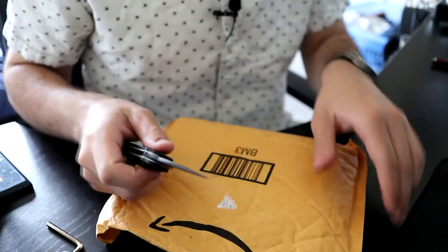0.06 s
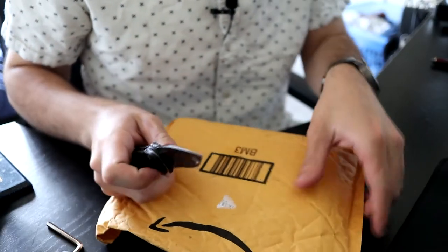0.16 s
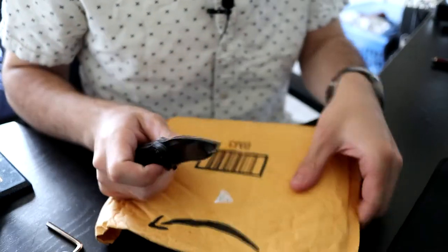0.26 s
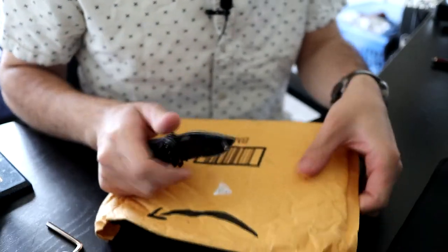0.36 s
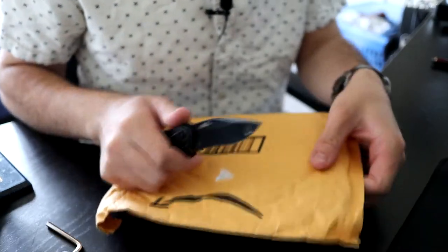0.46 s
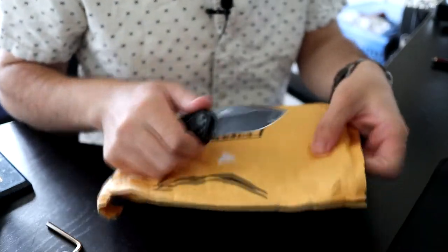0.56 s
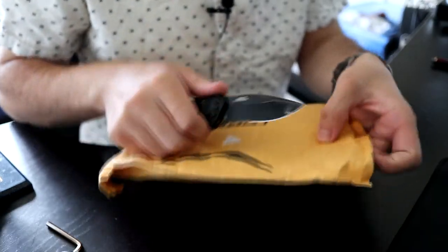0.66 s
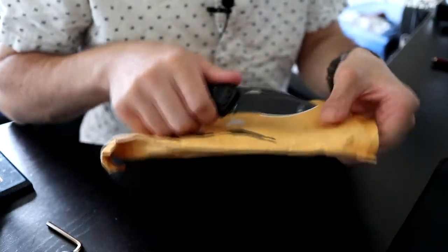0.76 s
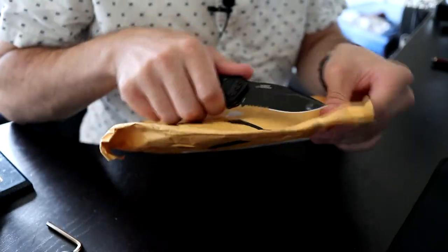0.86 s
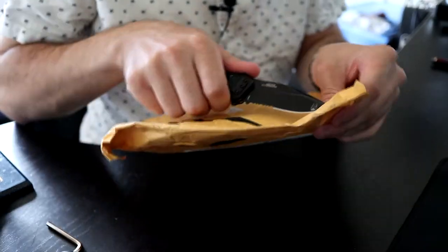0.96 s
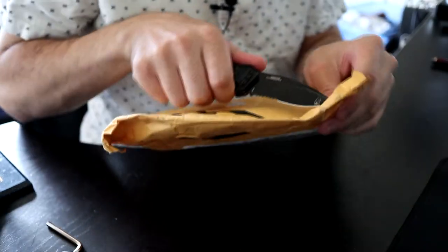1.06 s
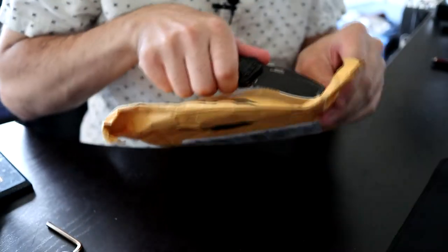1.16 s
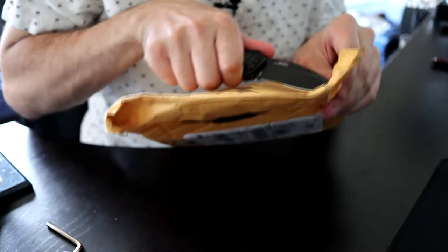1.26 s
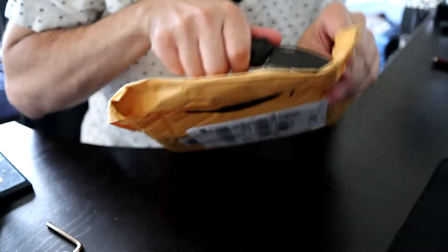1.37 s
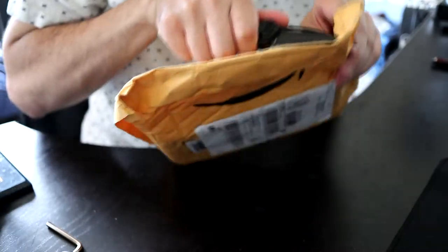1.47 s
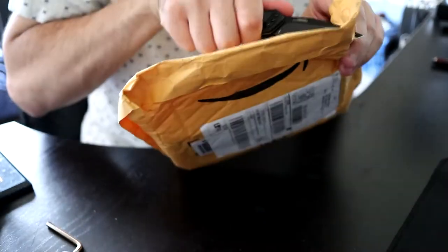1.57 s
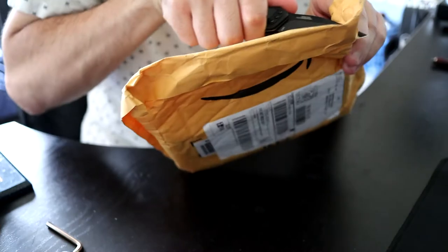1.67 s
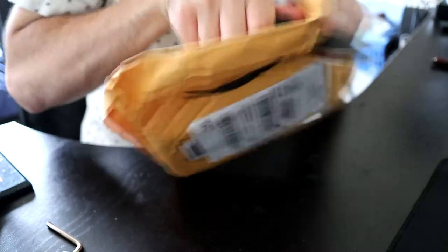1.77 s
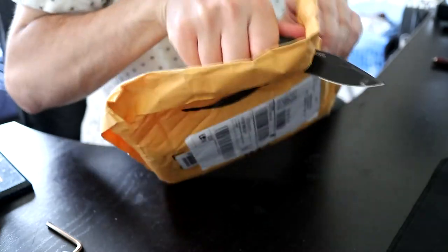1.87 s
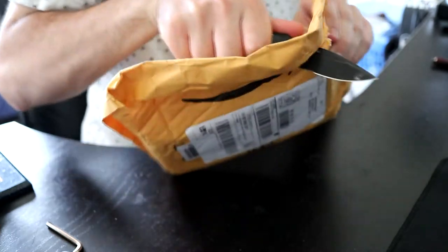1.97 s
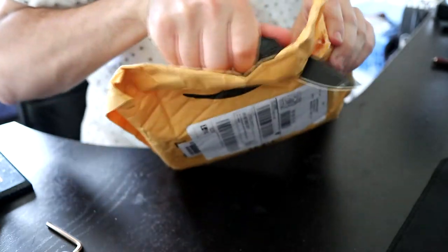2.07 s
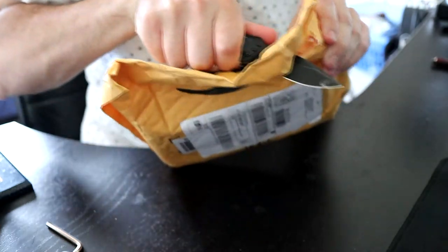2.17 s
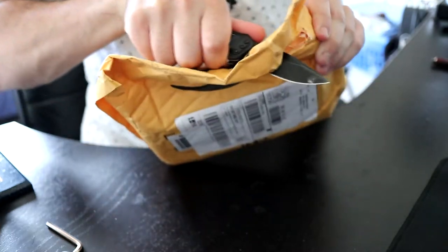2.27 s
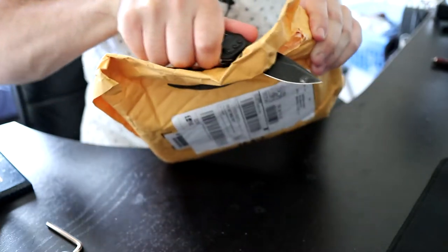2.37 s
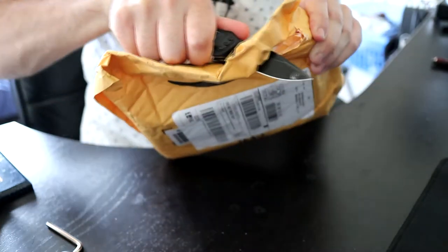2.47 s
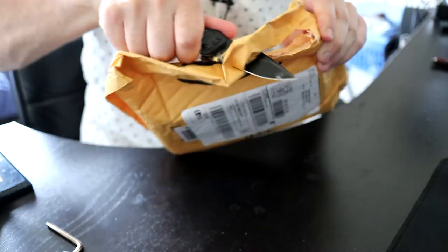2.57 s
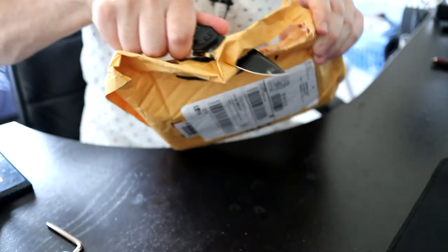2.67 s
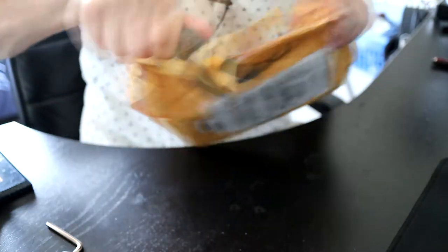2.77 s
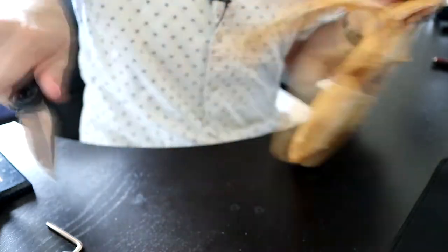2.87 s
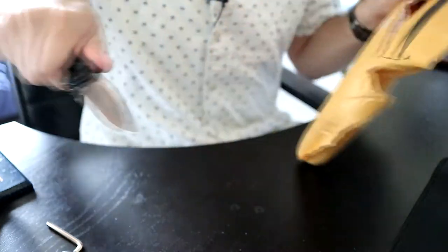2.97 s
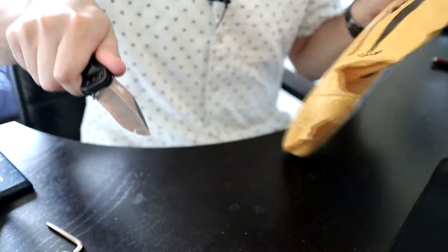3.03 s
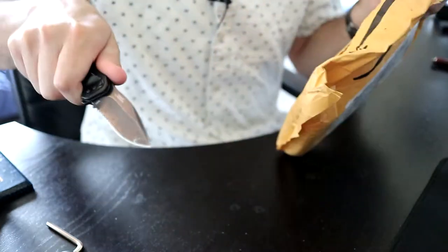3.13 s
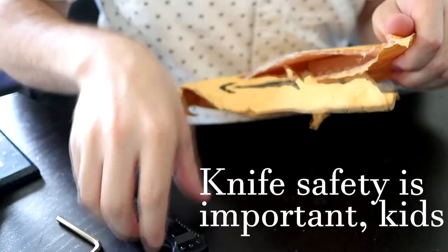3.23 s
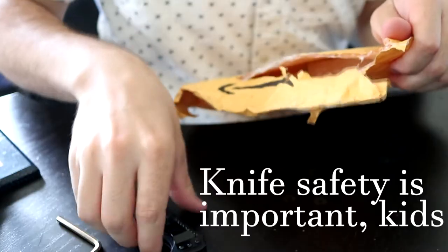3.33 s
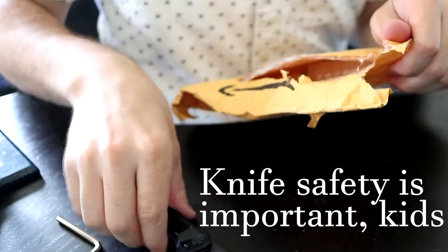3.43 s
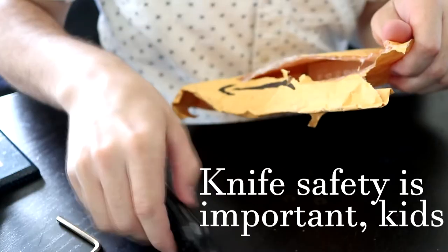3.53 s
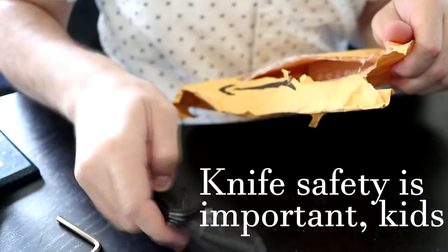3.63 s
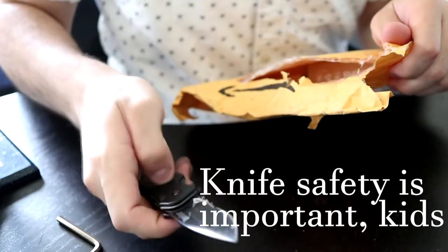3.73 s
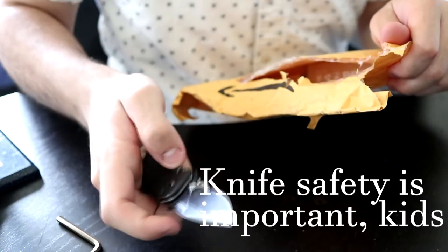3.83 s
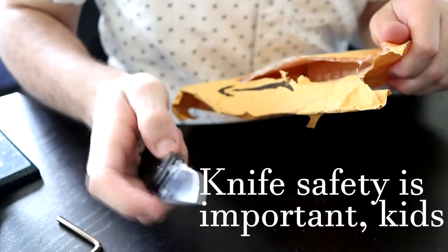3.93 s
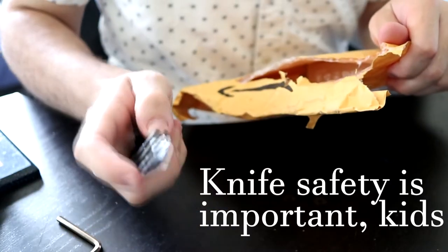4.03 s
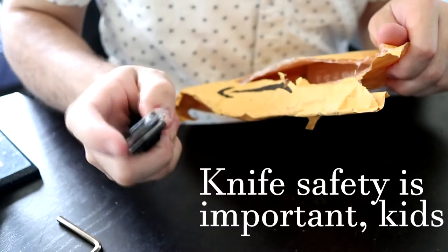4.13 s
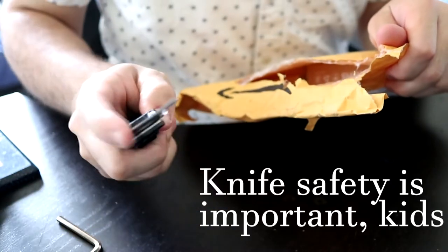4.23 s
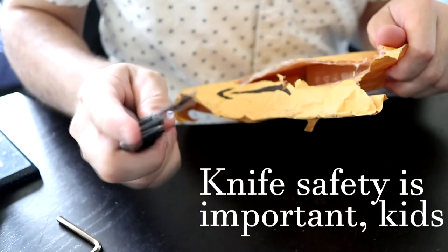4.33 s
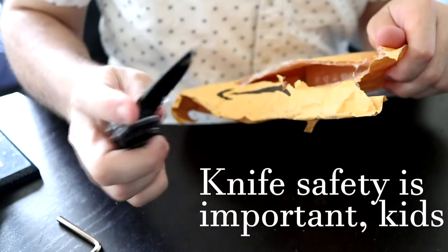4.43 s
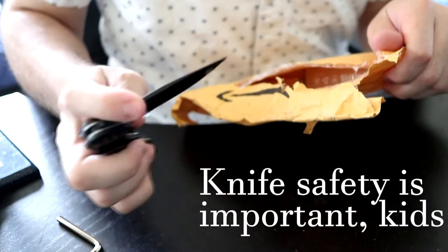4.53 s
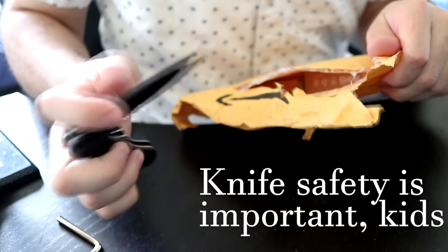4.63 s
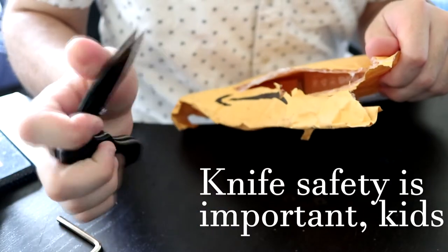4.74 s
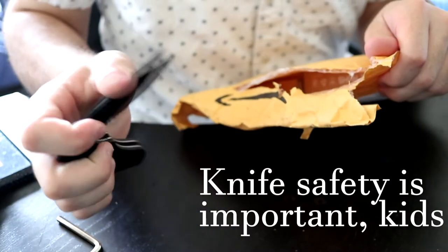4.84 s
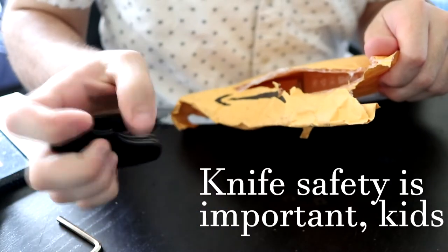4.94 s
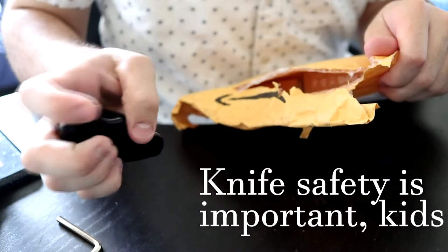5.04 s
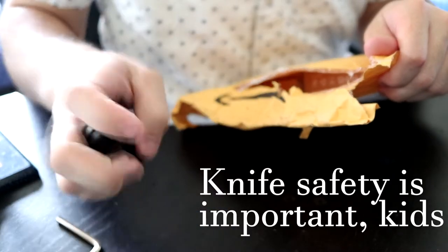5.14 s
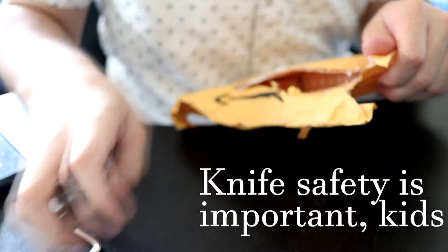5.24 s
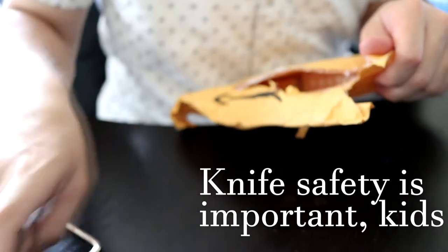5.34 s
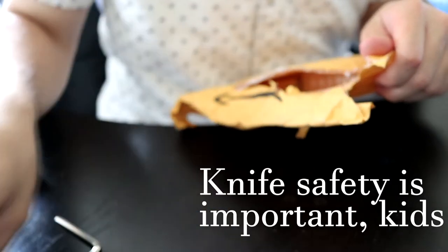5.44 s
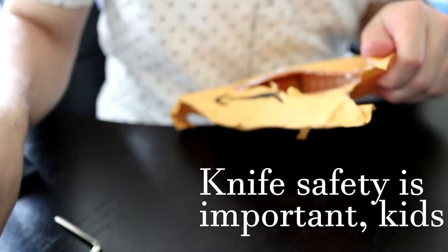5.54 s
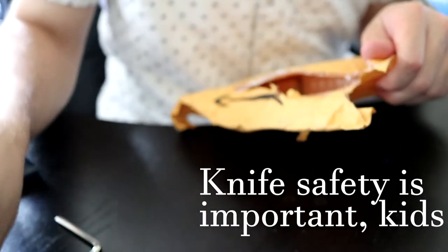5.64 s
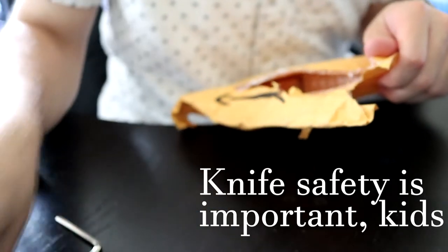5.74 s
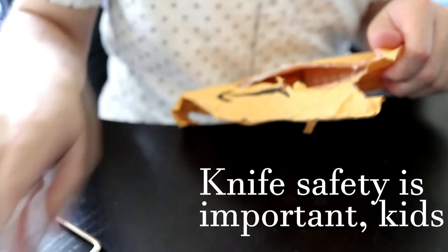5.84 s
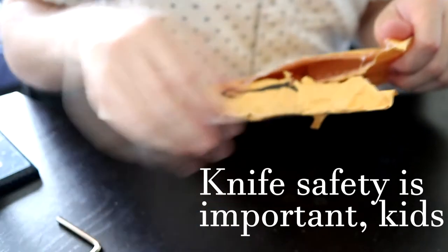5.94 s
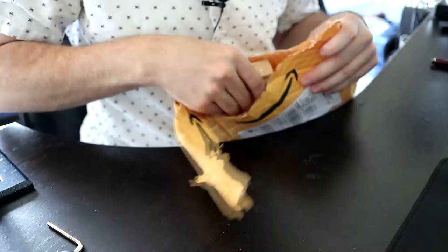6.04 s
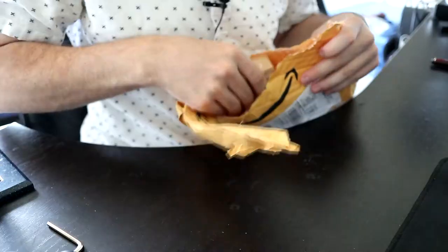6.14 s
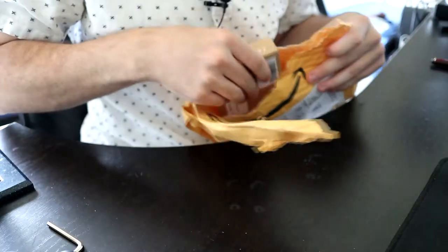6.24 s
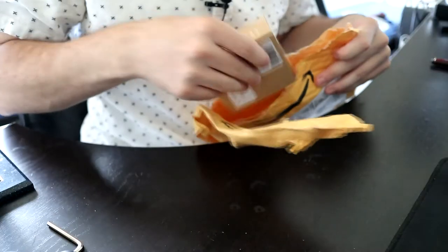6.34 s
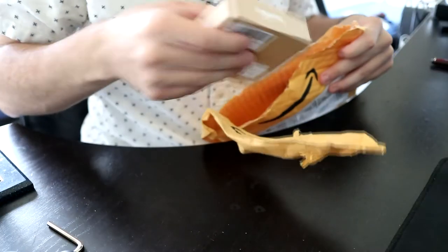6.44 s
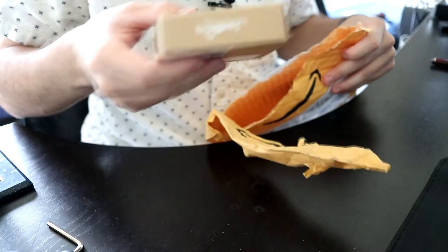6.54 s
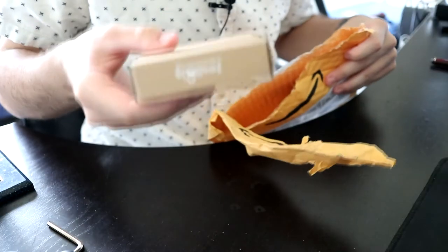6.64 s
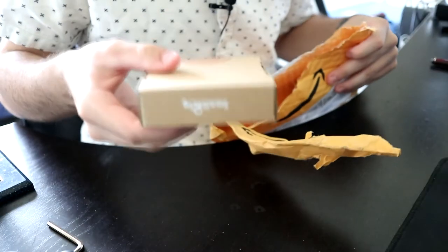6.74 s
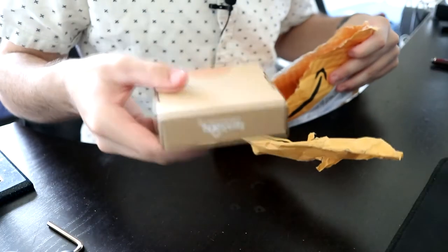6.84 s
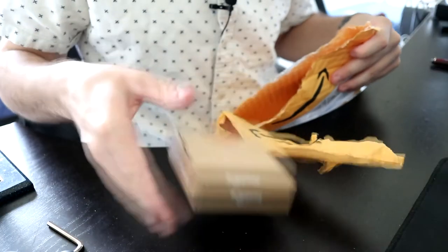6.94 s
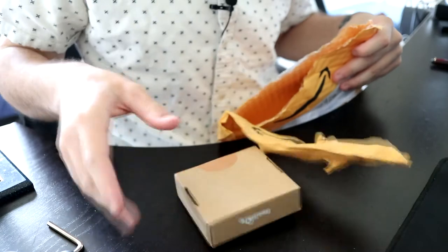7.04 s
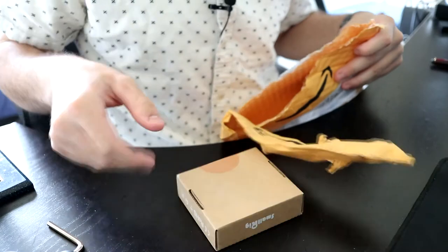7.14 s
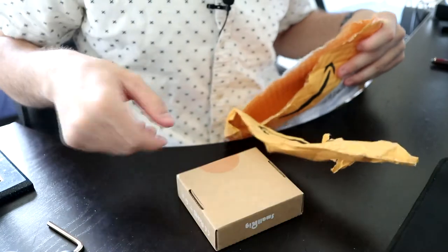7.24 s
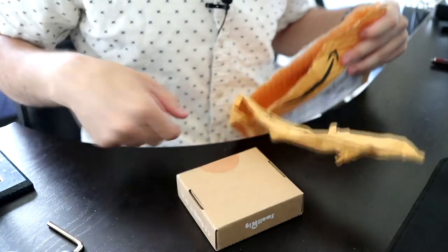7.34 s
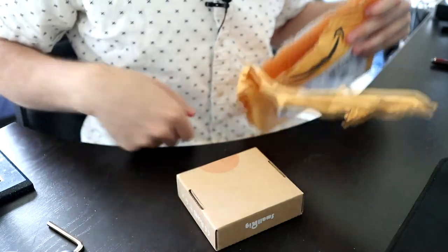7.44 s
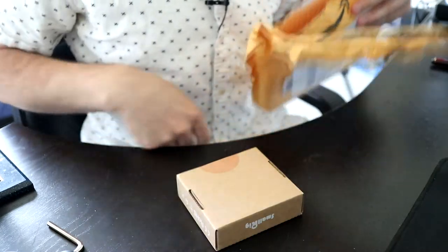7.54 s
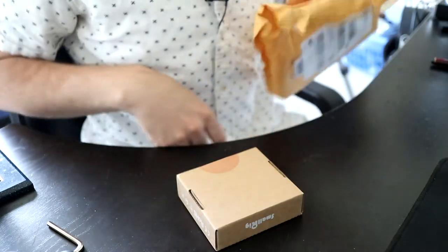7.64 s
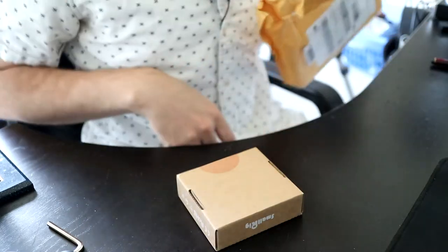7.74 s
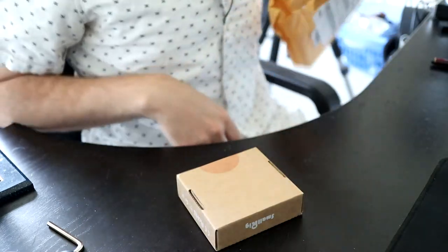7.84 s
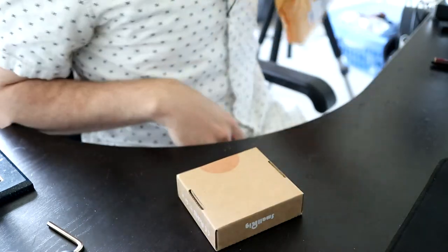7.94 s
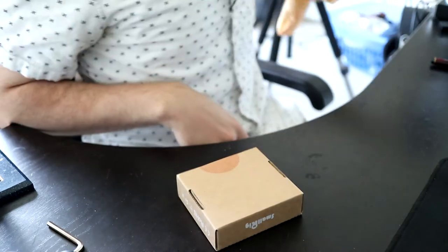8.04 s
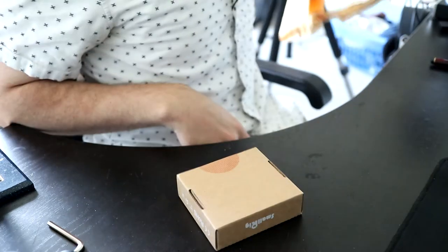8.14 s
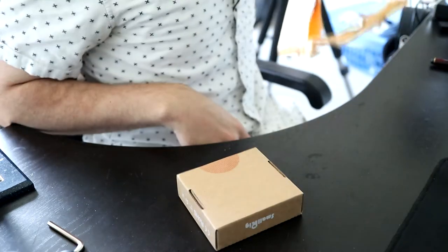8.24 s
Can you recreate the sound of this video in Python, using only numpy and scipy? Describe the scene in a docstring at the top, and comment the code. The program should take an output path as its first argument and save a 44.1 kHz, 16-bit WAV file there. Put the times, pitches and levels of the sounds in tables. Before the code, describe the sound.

In a small room, very close to the microphone, hands rustle a padded paper mailer over a low drone. A blade slits it in uneven bursts of bright crackle and deep ripping. Then the paper nearly quiets, a folding knife ticks and clicks sharply, and clatters onto the desk. A cardboard box scrapes out of the paper, lands with a short hollow knock, and faint rustling follows as the wrapper is lifted away.

```python
"""A low room drone, then paper rustling in both hands: a padded mailer close to a clip-on microphone in a small room.
A folding knife slits it open with snaps and rips, clicks shut and clatters onto the desk;
a small cardboard box scrapes out of the mailer and drops on the desk.
Paper and cardboard are dense showers of tiny fibre snaps; steel clicks are damped swings with a crack;
blows ring dying modes of desk, box and room, and a dense tail of reflections adds more of the room."""
import sys
import numpy as np
from scipy import signal
from scipy.fft import rfft, irfft
from scipy.io import wavfile
from scipy.ndimage import uniform_filter1d

SR = 44100
rng = np.random.default_rng(int(sys.argv[2]) if len(sys.argv) > 2 else 0)


def unload_audio(sound):
    """Save the sound as a 16-bit wav file, at the path given as the first command line argument."""
    columns = np.transpose(np.atleast_2d(sound))
    # keep every value between -1 and 1, then stretch to whole-number steps
    steps = np.round(np.clip(columns, -1, 1) * 32767)
    wavfile.write(sys.argv[1], SR, steps.astype(np.int16))


N = 366030

# colour of loose mailer paper: f/Hz, relative level/dB per Hz
PAPER_COLOUR = [(71, -49), (120, -8.5), (184, -3), (341, -2.5), (592, -2), (698, -3.5), (892, -5.5),
                (1210, -2.5), (1860, -6), (2750, -9.5), (5750, -5.5), (9020, -10.5), (13900, -12),
                (16000, -19.5)]


def amp(db):
    """Amplitude factor of a level in dB."""
    return 10 ** (np.asarray(db) / 20)


def unit(x):
    """The same sound at an RMS of 1."""
    return x / np.sqrt(np.mean(x ** 2) + 1e-20)


def read(points, hz):
    """Value of a table at any frequency, interpolated along log frequency."""
    f, value = np.transpose(points)
    return np.interp(np.log(hz + 1), np.log(f + 1), value)


def add(mix, s, sound):
    """Lay a sound into the mix at s seconds."""
    part = mix[max(round(s * SR), 0):][:len(sound)]
    part += sound[:len(part)]


def band(x, lo_hz, hi_hz, order=3):
    """Butterworth band-pass."""
    sos = signal.butter(order, [lo_hz, min(hi_hz, .48 * SR)], "band", fs=SR, output="sos")
    return signal.sosfilt(sos, x)


def background():
    """Low room rumble, faint hiss and a wavering hum, which swell and ebb together."""
    # rumble and hiss ahead of the swell: f/Hz, level/dB per Hz
    hiss = [(10, -92.5), (25, -85), (53, -68.5), (90, -79), (160, -87), (250, -87), (400, -101),
            (600, -109), (1000, -120), (2000, -121), (5000, -115), (9000, -119), (16000, -130)]
    # swell of the whole background: t/s, level/dB
    drone = [(0, -2.5), (3.2, -9.5), (3.4, 0.5), (5.3, 3.5), (6.8, 2.5), (8.3, -5.5)]
    hum_hz, hum_db = 120.9, -55.5  # RMS level ahead of the swell
    density = amp(read(hiss, np.fft.rfftfreq(N, 1 / SR))) * np.sqrt(SR / 2)
    noise = irfft(rfft(rng.standard_normal(N)) * density, N)
    # a narrow band of noise wavers like an unsteady hum
    hum = amp(hum_db) * unit(band(rng.standard_normal(N), hum_hz - 4, hum_hz + 4, order=2))
    swell_db = np.interp(np.arange(N) / SR, *np.transpose(drone))
    return amp(swell_db) * (noise + hum)


def colour(x, spectrum, size=2048):
    """Causal minimum-phase filter with the given spectrum: nothing sounds ahead of a click."""
    log_gain = np.log(amp(read(spectrum, abs(np.fft.fftfreq(size, 1 / SR)))))
    taps = np.fft.ifft(np.exp(np.conj(signal.hilbert(log_gain)))).real
    return signal.oaconvolve(x, taps[:size // 2])[:len(x)]


def fibres(per_s, spread_db, rub_db, patch_db=5.5, drift_db=2, clump_db=1.5, count=14):
    """Tiny snaps of uneven size and steady rubbing; each snap rings its own mixture of patches of the sheet."""
    n, t = len(per_s), np.arange(400) / SR
    snaps_here = rng.random(n) < per_s / SR
    size = snaps_here * amp(spread_db * np.minimum(rng.exponential(1, n), 4))
    out = np.zeros(n)
    for hz in np.geomspace(200, 15000, count):
        cycles = hz * t
        patch = np.sqrt(hz) * unit(np.exp(-cycles / 0.98) * np.sin(2 * np.pi * cycles))
        share = amp(patch_db * rng.standard_normal(n))
        snapping = unit(size * share * rng.choice([-1, 1], n))
        drive = snapping + amp(rub_db) * rng.standard_normal(n)
        # patches tighten and slacken as the sheet bends
        drift = unit(uniform_filter1d(rng.standard_normal(n), size=2200, mode="wrap"))
        out += signal.oaconvolve(drive * amp(drift_db * drift), patch)[:n]
    out = unit(out)
    # the hand feeds in energy steadily, however the snaps share it
    out = out / np.sqrt(abs(uniform_filter1d(out ** 2, size=1300)) + 0.24)
    # stick and slip bunch the snaps into clumps a few milliseconds long
    clumps = unit(uniform_filter1d(rng.standard_normal(n), size=300, mode="wrap"))
    return unit(out * amp(clump_db * clumps))


def paper(db, bass_db, treble_db, per_s, spectrum, rub_db, spread_db, zing_db=0):
    """Fibre snaps over the hiss of rubbing; a slack sheet is deep, a taut one bright and sings against the blade."""
    rate = np.clip(per_s, 40, 20000) * np.ones(len(db))
    x = colour(fibres(rate, spread_db, rub_db), spectrum)
    bass, body, treble = band(x, 120, 700), band(x, 700, 4000), band(x, 4000, 20000)
    song = band(treble, 5940, 6900, order=1) + .8 * band(treble, 12800, 13000, order=1)
    treble = unit(treble + (amp(zing_db) - 1) * song)
    # db is the level of the body; bass and treble stand against it
    return amp(db) * (amp(bass_db) * unit(bass) - unit(body) + amp(treble_db) * treble)


def follow(rows):
    """The columns of a control curve, sample by sample."""
    s, *columns = np.transpose(rows)
    t = np.arange(s[0], s[-1], 1 / SR)
    return [np.interp(t, s, c) for c in columns]


def gripping(flex_db=2):
    """Both hands rub and flex the mailer while it is opened; its bass comes and goes as it bends."""
    # rustle of the grip: t/s, body level/dB
    grip = [(0.13, -67.5), (0.26, -48), (0.42, -50), (0.62, -48), (0.92, -48.5), (1.2, -44.5), (1.9, -49),
            (2.38, -49), (3.099, -53), (3.2, -70)]
    out, (db,) = np.zeros(N), follow(grip)
    flex = unit(uniform_filter1d(rng.standard_normal(len(db)), size=2600, mode="wrap"))
    bass_db, treble_db, snaps_per_s = -3.5 + flex_db * flex, 2, 2400
    rustle = paper(db, bass_db, treble_db, snaps_per_s, PAPER_COLOUR, rub_db=-0.5, spread_db=6.5)
    add(out, grip[0][0], rustle)
    return out


def handling(sheet, level_db=-15):
    """Low rumble of the flexing bag follows the strength of its rustle."""
    strength = np.sqrt(abs(uniform_filter1d(sheet ** 2, size=1500)))
    return amp(level_db) * strength * unit(band(rng.standard_normal(N), 37, 161, order=3))


def snap(hz, cycles, crack_db, crack_s):
    """A few damped swings around one pitch, a brief broad crack and its scatter off the desk; peak 1."""
    t = np.arange(3000) / SR
    partials = hz * np.array([[.72], [1], [1.25]])
    shares = np.array([[.5], [1], [.5]])
    waves = np.sin(2 * np.pi * (partials * t + rng.random((3, 1))))
    swing = (shares * np.exp(-partials * t / cycles) * waves).sum(0)
    decay = np.exp(-t / crack_s) + 0.058 * np.exp(-t / 0.0086)  # the slower part is the scatter
    crack = band(rng.standard_normal(len(t)) * decay, hz / 1.89, hz * 1.9, order=2)
    x = (swing + amp(crack_db) * crack / abs(crack).max()) * (1 - np.exp(-hz * t))
    return x / abs(x).max()


def scatter(per_s, peak_db, pitches_hz, cycles):
    """Snaps at random moments, each one of a few shapes."""
    shapes = [snap(hz, cycles, crack_db=3.5, crack_s=0.00055) for hz in pitches_hz]
    out, which = np.zeros(N), rng.integers(0, len(shapes), N)
    for at in np.flatnonzero(rng.random(N) < per_s / SR):
        add(out, at / SR, amp(peak_db[at]) * shapes[which[at]])
    return out


def crinkles(rustle, count=16):
    """Small folds buckle at random moments, as strongly as the sheet is being worked."""
    per_s, over_rustle_db, scatter_db, limit_db = 24, 12.5, 3, -20
    stiff_hz, slack_hz, slack_share = 5660, 1480, 0.23  # most are stiff little folds, some slack pockets
    rustle_db = 10 * np.log10(abs(uniform_filter1d(rustle ** 2, size=2600)) + 1e-12)
    peak_db = rustle_db + over_rustle_db + scatter_db * rng.standard_normal(N)
    centres_hz = np.where(np.arange(count) < slack_share * count, slack_hz, stiff_hz)
    pitches_hz = centres_hz * np.exp(0.34 * rng.uniform(-1.07, 1, count))
    return scatter(per_s, np.minimum(peak_db, limit_db), pitches_hz, cycles=1.2)


def creases():
    """The loudest creases buckle in single snaps; each also flicks the whole sheet."""
    # buckling creases: t/s, peak level/dB, centre f/Hz
    snaps = [(0.5043, -20, 5330), (0.6074, -23.5, 1080), (0.7595, -18.5, 1450), (0.7866, -22, 3900),
             (1.0006, -14.5, 1350), (1.1248, -11.5, 3850), (1.1309, -11, 3200), (1.1349, -9.5, 4500),
             (1.199, -17, 1190), (1.2152, -21.5, 1360), (1.2236, -16.5, 7340), (1.379, -18, 5670),
             (1.392, -10, 5440), (1.518, -11.5, 4770), (1.5547, -17, 4790), (1.5596, -12.5, 5300),
             (1.5867, -13.5, 5600), (1.6822, -14, 1290), (1.717, -15.5, 6500), (1.779, -7.5, 4300),
             (1.8248, -12.5, 1000), (1.8361, -10.5, 1740), (2.0628, -27, 2000), (2.125, -12.5, 2100),
             (2.2266, -19.5, 3020), (2.285, -15, 2160), (2.4708, -14, 4700), (2.482, -14, 1320),
             (2.334, -20.5, 11900), (2.533, -16.5, 2090), (2.749, -15.5, 5170), (3.0993, -20.5, 1125),
             (7.294, -29, 1180), (7.3663, -28.5, 1060), (7.7379, -24.5, 5300), (8.0376, -29.5, 1580)]
    out = np.zeros(N)
    for s, db, hz in snaps:
        add(out, s, amp(db) * snap(hz, cycles=0.9, crack_db=-2.5, crack_s=0.00039))
        flick = snap(1400, cycles=3.1, crack_db=3.5, crack_s=0.0013)
        add(out, s, amp(db - 18.5) * flick)
    return out


def stroke(rise_s, hold_s, tail_s=.07):
    """Level in dB of one push: it builds, holds and lets go. Also the share of the build still to come."""
    build_db, release_db_per_s = 22, 502.5
    t = np.arange(0, rise_s + hold_s + tail_s, 1 / SR)
    early = np.clip(1 - t / rise_s, 0, 1)
    return -build_db * early - release_db_per_s * np.maximum(t - rise_s - hold_s, 0), early


def cutting(trim_db=-1.5):
    """Each stroke of the blade strains the paper, bright at first, until it rips with its full depth."""
    # strokes of the blade: start t/s, rise/s, hold/s, body level/dB ahead of the trim,
    # bass and treble level/dB against the body, singing of the taut edge/dB
    cuts = [(0.569, .04, 0.067, -43, 0, -13, 0), (1.29, 0.083, 0.012, -30.5, -8.5, 3, 7),
            (1.385, 0.032, .025, -34.5, -1, -5.5, -3.5), (1.43, 0.057, 0.039, -36, -9, 1, 5.5),
            (1.548, 0.0056, 0.01, -35.5, -11, 7, 9), (1.575, 0.016, .025, -42, -4.5, 5.5, 8.5),
            (1.66, 0.063, 0.051, -37, -8, 9.5, 6), (1.745, 0.053, 0.02, -23, -2, -5.5, -2.5),
            (1.92, 0.19, 0.027, -34, -1, 2, -1.5), (2.25, 0.015, 0.032, -44, 6.5, -0.5, 3),
            (2.42, 0.084, 0.11, -34, -2.5, 1, 1), (2.526, .005, 0.0066, -25.5, -8, 1, 4.5),
            (2.68, 0.12, 0.054, -25, 1.5, 1, -3), (2.881, 0.043, .015, -40, -8, 2, -6)]
    # colour of paper stretched over the blade: f/Hz, relative level/dB per Hz
    taut_colour = [(59, -39.5), (100, -8.5), (229, -4), (452, -7.5), (608, -2), (872, -8), (1250, -4),
                   (2000, -7), (2690, -13), (6020, -8.5), (8280, -18), (13800, -15.5), (16000, -20)]
    taut_db, snaps_per_s = 5.5, 1800  # strain thins the bass and lifts the treble by up to taut_db
    out = np.zeros(N)
    for s, rise_s, hold_s, db, bass_db, treble_db, zing_db in cuts:
        push_db, early = stroke(rise_s, hold_s)
        rip = paper(trim_db + db + push_db, bass_db - taut_db * early, treble_db + taut_db * early,
                    snaps_per_s, taut_colour, rub_db=-6, spread_db=4.5, zing_db=zing_db)
        add(out, s, rip)
    return out


def soft_bumps():
    """Soft low bumps, each a few slow swings: puffs of air from the mailer and a thump of the grip."""
    # soft low bumps: t/s, peak level/dB, f/Hz, length/s
    bumps = [(2.108, -41, 127, 0.032), (2.801, -26, 102, 0.045), (2.84, -24.5, 139, 0.027),
             (2.866, -34.5, 69, 0.05), (4.614, -32, 94.3, 0.026), (6.034, -18, 60.3, 0.013),
             (6.074, -19.5, 55.5, 0.026), (6.381, -19, 108, .022), (6.396, -22, 60.5, 0.034)]
    out = np.zeros(N)
    for s, db, hz, length in bumps:
        t = np.arange(0, length, 1 / SR)
        add(out, s, amp(db) * np.sin(2 * np.pi * hz * t) * signal.windows.tukey(len(t), .6))
    return out


def holding():
    """The open mailer hangs in one hand and is lifted away: sparse ticks when still, denser rustle when moved."""
    # rustle of the open mailer: t/s, body level/dB, bass and treble level/dB against the body
    hold = [(3.2, -60, -3, -2.5), (3.47, -60, 11, -0.5), (3.75, -77.5, -13, 8), (4.05, -86.5, -14, -4),
            (4.49, -77.5, -9, 12), (4.621, -53, 4.5, -6), (4.78, -63.5, -0.5, 8.5), (4.9, -87, -7, 7),
            (5.25, -71, 9.5, -3), (5.45, -55, 0.5, -3), (6.0, -53.5, -3, -9), (6.5, -54.5, -8, 5),
            (6.65, -60, 1.5, -2), (7.24, -60.5, 6.5, -2.5), (7.36, -56.5, -4, 2), (7.54, -60, 0, -3),
            (7.629, -53.5, -6, 0), (7.9, -68.5, -2.5, 7.5), (8.05, -61.5, -3.5, -2), (8.3, -73, -9.5, 13)]
    out, (db, bass_db, treble_db) = np.zeros(N), follow(hold)
    # fibres snap at this rate at the reference level, ten times as often per tenfold_db more
    snaps_per_s, reference_db, tenfold_db = 900, -58, 18
    per_s = snaps_per_s * 10 ** ((db - reference_db) / tenfold_db)
    rustle = paper(db, bass_db, treble_db, per_s, PAPER_COLOUR, rub_db=-11.5, spread_db=3.5)
    add(out, hold[0][0], rustle)
    return out


def ring(modes, t, uneven_db, detune=0.013):
    """Dying modes; each blow lands elsewhere and shares its force differently."""
    hz, db, t60 = np.transpose(modes)[:, :, None]
    luck, shift = rng.standard_normal((2, len(hz), 1))
    level = amp(db + uneven_db * luck - 60 * t / t60)
    return (level * np.sin(2 * np.pi * hz * (1 + detune * shift) * t)).sum(0)


def knocks(rows, modes, trim_db, thud_db, thud_s, tick_s, rattle_db):
    """Each blow is a dense short thud, a tick of contact, a brief rattle and the dying modes it sets ringing."""
    # colour of thud, tick and rattle: f/Hz, relative level/dB per Hz
    knock_colour = [(60, -6.5), (150, 3), (550, 7.5), (1000, -2), (2000, -8.5), (3000, -11.5), (7000, -19),
                    (16000, -31)]
    out, t = np.zeros(N), np.arange(SR // 2) / SR
    rattle = amp(rattle_db) * np.exp(-t / 0.022)
    for s, db, bass_db, treble_db in rows:
        a, b = rng.standard_normal((2, len(t)))
        thud = unit(colour(a * (np.exp(-t / thud_s) + rattle), knock_colour))
        x = unit(ring(modes, t, uneven_db=6.5)) + amp(thud_db) * thud
        tick = colour(b * (np.exp(-t / tick_s) + 0.54 * rattle), knock_colour)
        parts = band(x, 60, 300), band(x, 300, 2200), band(tick, 1800, 14000, order=2)
        # each band is levelled by its first 1/50, 1/110 or 1/150 s
        bass, body, treble = [p / np.std(p[:SR // per_s]) for p, per_s in zip(parts, (50, 110, 150))]
        add(out, s, amp(db + trim_db) * (amp(bass_db) * bass - body + amp(treble_db) * treble))
    return out


def knife_knocks():
    """The knife knocks and clatters, ringing modes of the desk and the room."""
    # blows of the knife: t/s, body level/dB ahead of the trim, bass and treble level/dB against the body
    blows = [(3.309, -35.5, -4.5, -35), (3.324, -41.5, -13, -30), (3.465, -49.5, 11, -10),
             (3.537, -33.5, -8, -10), (5.532, -29, -12, -3.5), (5.545, -29.5, 1, -1),
             (5.559, -25.5, -18, -9), (5.6555, -21.5, -19, -3), (5.6835, -22, -1.5, 1.5),
             (5.708, -14.5, -22, -30), (5.717, -26.5, 5, -25), (5.768, -20.5, -8, -20),
             (5.783, -27, -11, -4.5), (5.799, -26.5, -1, -25), (5.854, -25.5, -12, -12),
             (7.483, -42.5, 2.5, -22)]
    # ringing modes of the desk and the room: f/Hz, relative level/dB, t60/s
    desk_and_room_modes = [(130.2, 0, 0.46), (206.5, -11, 0.23), (240, 0, 0.16), (344, -0.5, 0.27),
                           (459, 4.5, 0.23), (546, 6, 0.11), (639, -6, 0.17), (890, -8, 0.25),
                           (1164, -8, 0.1), (1400, -16, .06), (1766, -35, 0.13), (2060, -23, 0.11)]
    return knocks(blows, desk_and_room_modes, trim_db=-1.5, thud_db=2, thud_s=0.0073, tick_s=0.0039, rattle_db=-4)


def knife():
    """The knife's pivot and lock click in steel; each click also rings the handle's liner."""
    # clicks: t/s, peak level/dB, centre f/Hz, liner level/dB against the click ahead of liner_db
    clicks = [(3.4635, -28, 3230, -30), (4.088, -37, 8900, -27), (4.178, -35, 2750, -28),
              (4.191, -24.5, 3620, -26), (4.326, -34.5, 4500, -30), (4.392, -27.5, 3770, -40),
              (4.43, -40, 2880, -28), (4.522, -9.5, 6180, -30), (4.576, -28, 7260, -27),
              (4.609, -29.5, 7500, -30), (4.691, -30, 8060, -30), (4.708, -33, 7030, -30),
              (5.0187, -12.5, 6700, 5), (5.0262, -21.5, 5450, 4.5), (5.533, -19, 6150, 7.5),
              (5.656, -10, 6130, 4), (5.684, -24, 4450, -18)]
    # ringing of the liner: f/Hz, relative level/dB, t60/s
    liner_modes = [(1930, -10, .04), (1990, -8, .038), (2060, -12, .03), (3666, -17, .02), (5700, -6, .015),
                   (6360, -6, .015), (7100, -4, .015), (8600, -6, .015)]
    liner_db, uneven_db = -14, 1.5
    out, t = np.zeros(N), np.arange(8000) / SR
    for s, db, hz, ring_db in clicks:
        add(out, s, amp(db) * snap(hz, cycles=4.7, crack_db=4.5, crack_s=0.0017))
        add(out, s, amp(db + ring_db + liner_db) * ring(liner_modes, t, uneven_db))
    return out


def fidget(count=12):
    """Fingers turn the knife and its parts tick faintly, by chance."""
    start_s, end_s, ticks_per_s = 3.6, 4.85, 26
    peak_db, scatter_db, centre_hz = -44.5, 4, 4520
    t = np.arange(N) / SR
    per_s = ticks_per_s * ((t > start_s) & (t < end_s))
    pitches_hz = centre_hz * np.exp(.5 * rng.uniform(-1, 1, count))
    return scatter(per_s, peak_db + scatter_db * rng.standard_normal(N), pitches_hz, cycles=4.5)


def sliding():
    """The box scrapes along the inside of the mailer and slips from the fingers just before it lands, with a
    dense, fine grain."""
    # scrapes: start t/s, rise/s, hold/s, body level/dB, bass and treble level/dB against the body
    slides = [(6.028, 0.0062, 0.039, -29, -4, 1), (6.08, .01, 0.11, -40, -7.5, 1.5),
              (6.152, 0.068, 0.078, -33, -6, 8), (6.268, 0.043, 0.087, -33, -3, 3.5),
              (6.392, .01, 0.047, -46.5, -3, 0), (6.983, 0.011, 0.0077, -33.5, -2, 6)]
    # colour of cardboard: f/Hz, relative level/dB per Hz
    cardboard_colour = [(71, -25), (120, -3), (241, -8.5), (278, -4.5), (427, -8), (463, -3), (757, -10.5),
                        (805, -8.5), (1400, -14), (2200, -11), (2750, -16.5), (7820, -7), (14700, -13.5),
                        (16000, -32)]
    snaps_per_s = 9300
    out = np.zeros(N)
    for s, rise_s, hold_s, db, bass_db, treble_db in slides:
        push_db, _ = stroke(rise_s, hold_s)
        scrape = paper(db + push_db, bass_db, treble_db, snaps_per_s, cardboard_colour, rub_db=-2.0, spread_db=3.5)
        add(out, s, scrape)
    return out


def box_knocks():
    """The box knocks against mailer and desk, ringing short modes of its own and longer low modes of the room."""
    # blows of the box: t/s, body level/dB ahead of the trim, bass and treble level/dB against the body
    blows = [(6.04, -32.5, 1, 7), (6.388, -27, -8.5, 5.5), (7.0165, -12.5, -11.5, -10.5),
             (7.02, -15, -22, -19), (7.034, -15, -12, -13), (7.0525, -16.5, -12, -12),
             (7.127, -27, -11, -29), (7.132, -18, -16, -14)]
    # short modes of the box and longer low modes of the room: f/Hz, relative level/dB, t60/s
    box_and_room_modes = [(124, -11, 0.59), (205.3, -4, 0.25), (399, -1, .12), (545, -3.5, .17),
                          (600, 6, 0.054), (665, -5, 0.11), (810, 0.5, 0.049), (916, -0.5, .05),
                          (1210, -6.5, .03), (1456, 2, 0.025), (1940, -7, .035)]
    return knocks(blows, box_and_room_modes, trim_db=-1, thud_db=1.5, thud_s=0.0041, tick_s=0.0022, rattle_db=-33)


def room(x, gap_s=0.0021):
    """Dense reflections after a short gap, each band dying at its own speed."""
    # decay of the room: f/Hz, t60/s
    decay = [(60, 0.23), (125, 0.47), (400, 0.32), (1000, 0.28), (3000, 0.33), (7000, 0.27), (10000, 0.15),
             (16000, 0.16)]
    hz, t, z = signal.stft(rng.standard_normal(SR), SR, nperseg=256)
    tail = signal.istft(z * amp(-60 * t / read(decay, hz)[:, None]), SR, nperseg=256)[1]
    # silent for gap_s, then fading in over as long again
    tail *= np.clip(np.arange(len(tail)) / SR / gap_s - 1, 0, 1)
    return signal.fftconvolve(x, tail / np.linalg.norm(tail))[:N]


def scene():
    """Mailer, knife and desk close to the microphone, with a little of the room."""
    rustle = gripping() + cutting() + holding()
    sheet = rustle + sliding()
    mailer = sheet + creases() + crinkles(rustle)
    steel = knife() + fidget()
    blows = knife_knocks() + box_knocks()
    wet = room(amp(-16.0) * mailer + amp(-10) * steel + amp(-9.5) * blows)
    return (mailer + steel + blows + wet + soft_bumps() + handling(sheet) + background())[None]


def record(dry, ceiling=0.66):
    """The small microphone loses the deepest bass and rounds off the loudest peaks; then the band limit."""
    edge_hz = 16100
    lean = signal.sosfilt(signal.butter(2, 32, "high", fs=SR, output="sos"), dry)
    soft = ceiling * np.tanh(lean / ceiling)
    return signal.oaconvolve(soft, signal.firwin(511, edge_hz, window=("kaiser", 9), fs=SR)[None], "same")


dry = scene()
out = record(dry)
unload_audio(out)
```